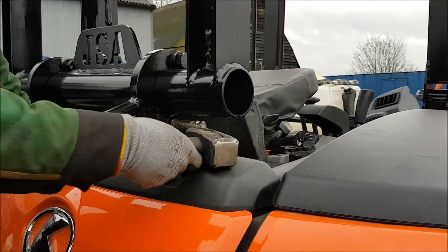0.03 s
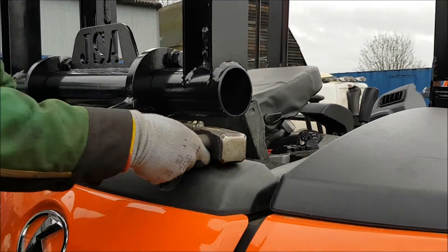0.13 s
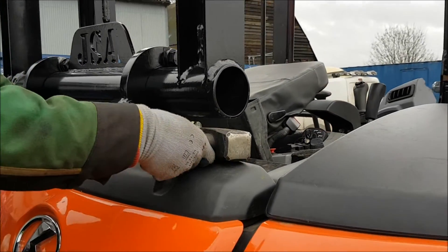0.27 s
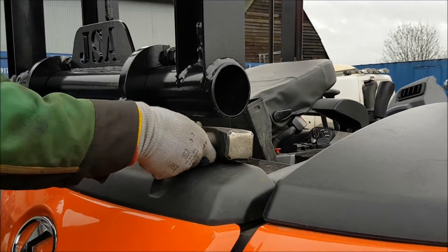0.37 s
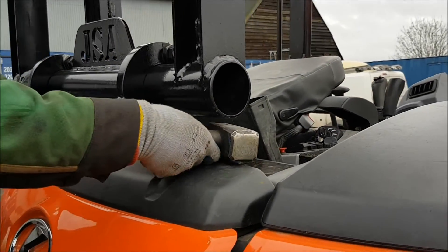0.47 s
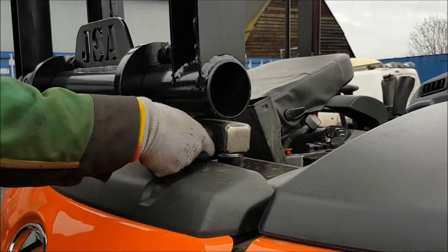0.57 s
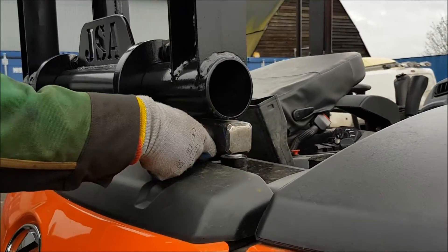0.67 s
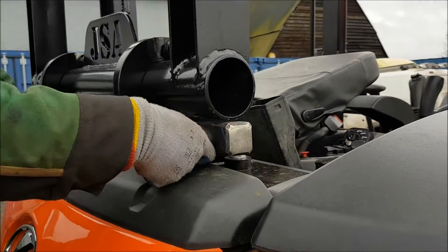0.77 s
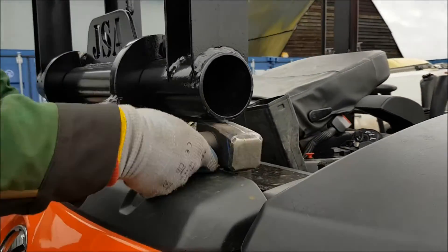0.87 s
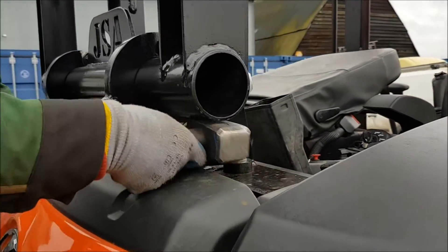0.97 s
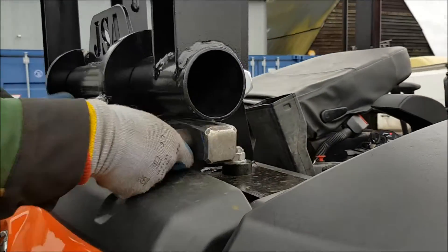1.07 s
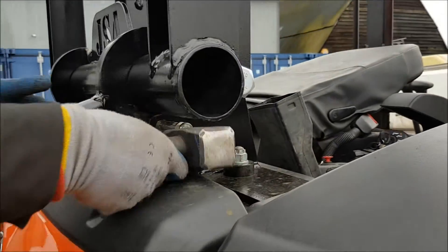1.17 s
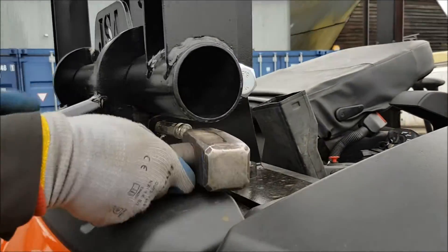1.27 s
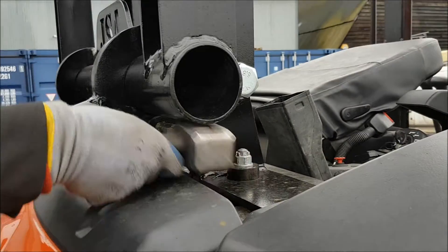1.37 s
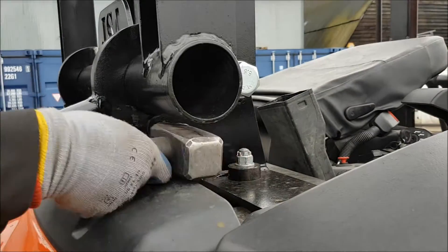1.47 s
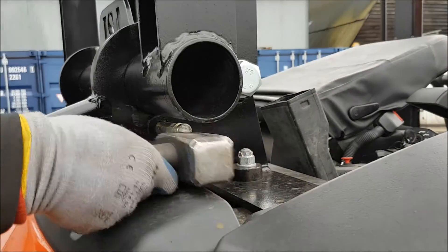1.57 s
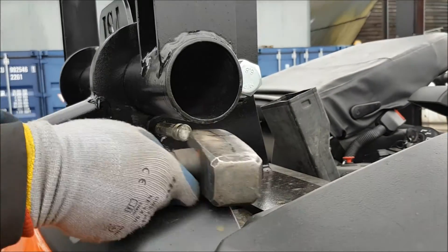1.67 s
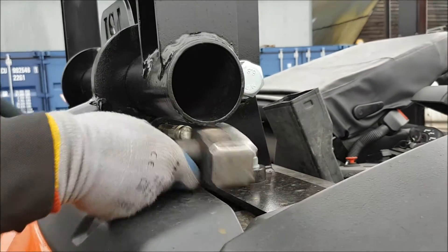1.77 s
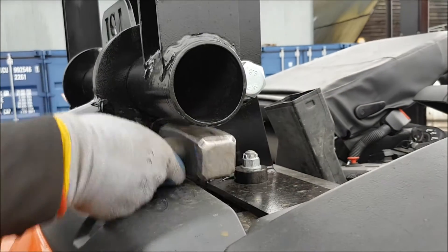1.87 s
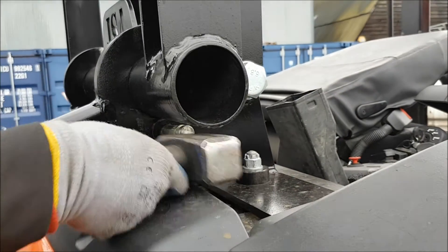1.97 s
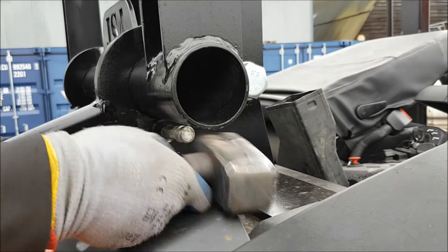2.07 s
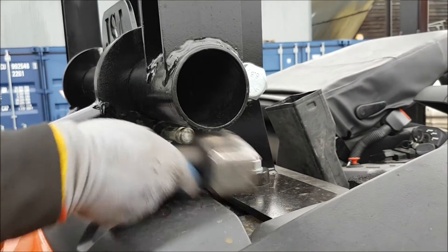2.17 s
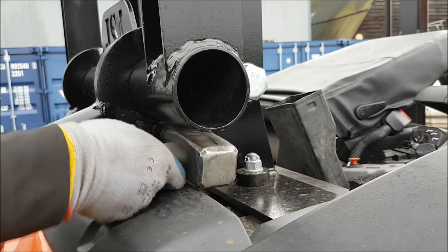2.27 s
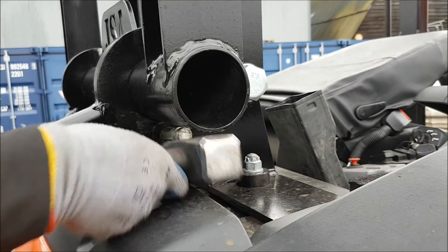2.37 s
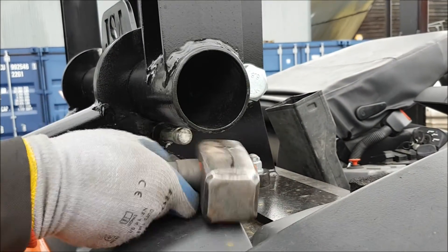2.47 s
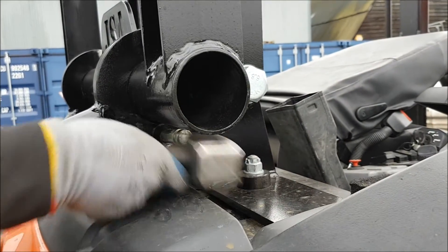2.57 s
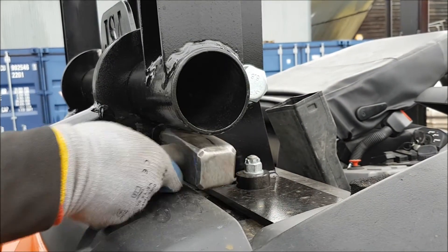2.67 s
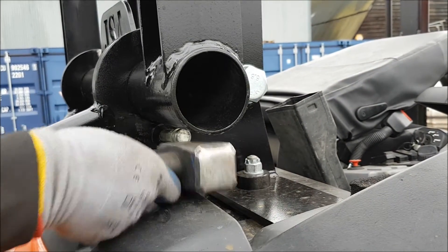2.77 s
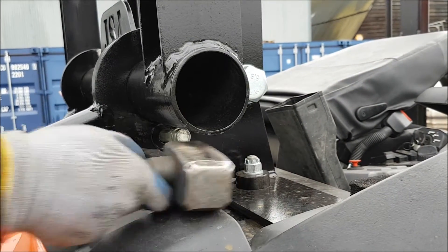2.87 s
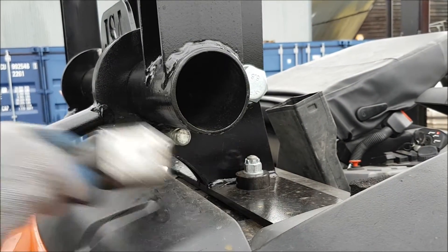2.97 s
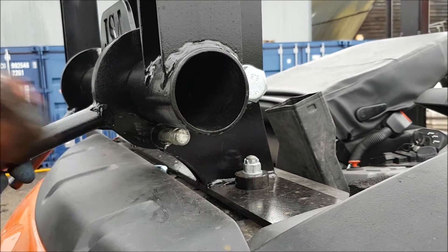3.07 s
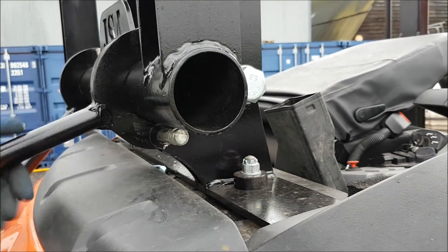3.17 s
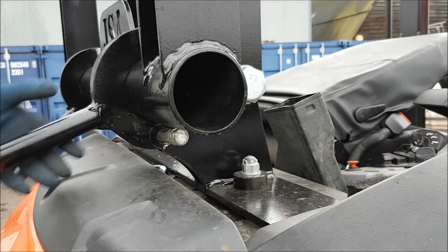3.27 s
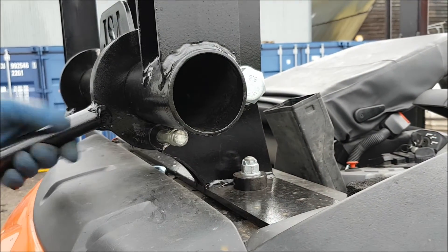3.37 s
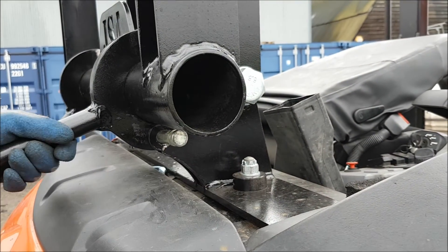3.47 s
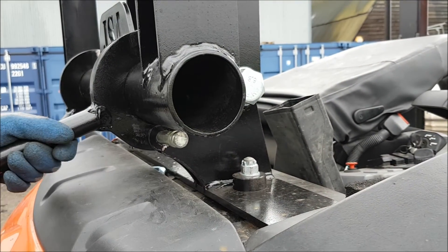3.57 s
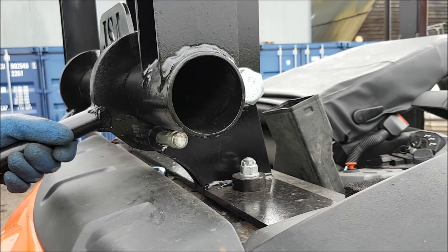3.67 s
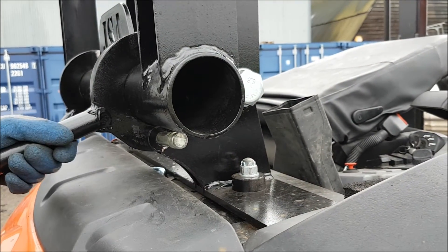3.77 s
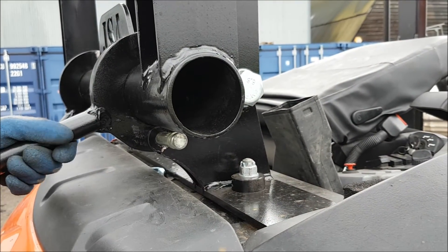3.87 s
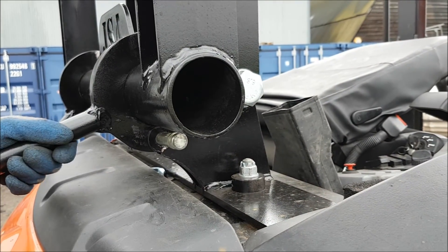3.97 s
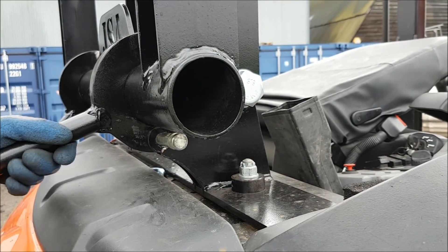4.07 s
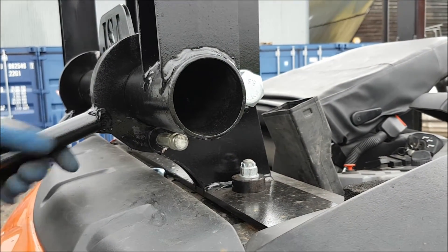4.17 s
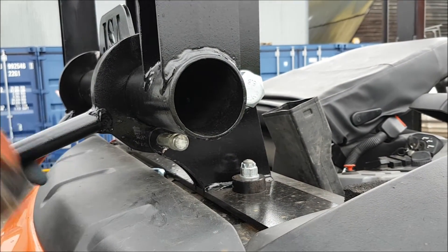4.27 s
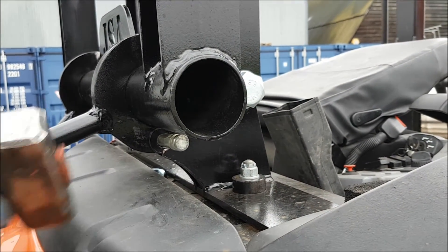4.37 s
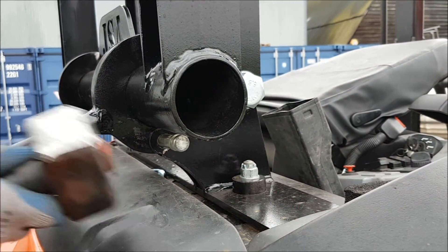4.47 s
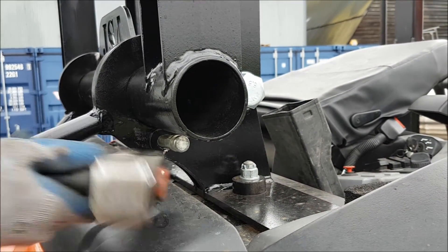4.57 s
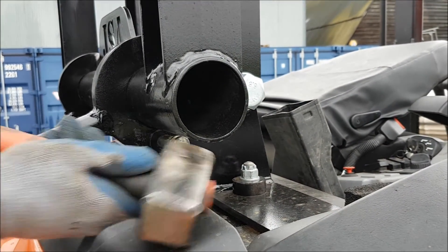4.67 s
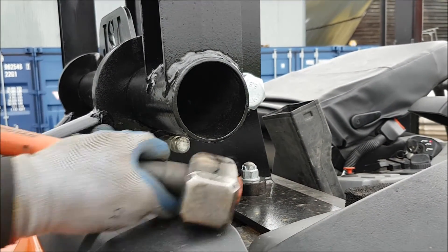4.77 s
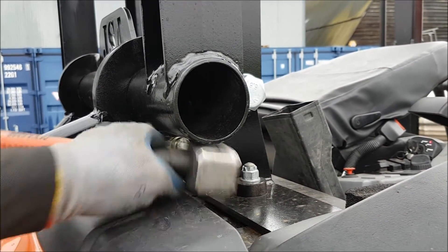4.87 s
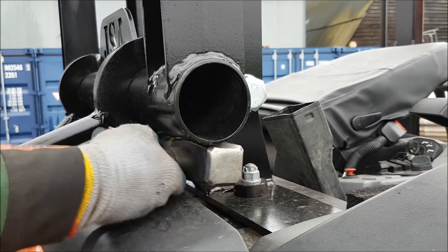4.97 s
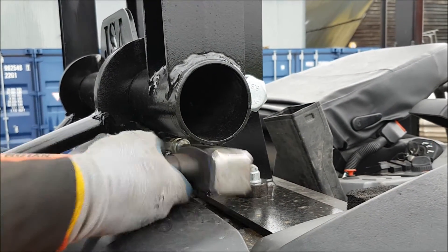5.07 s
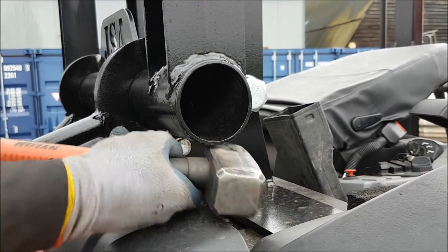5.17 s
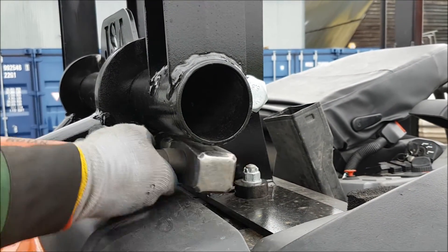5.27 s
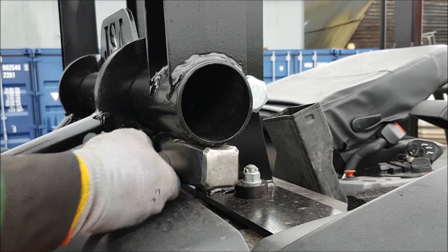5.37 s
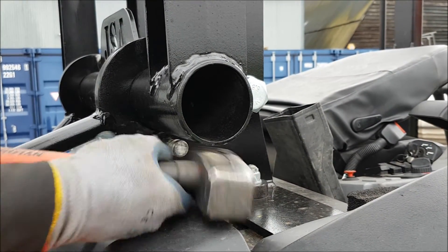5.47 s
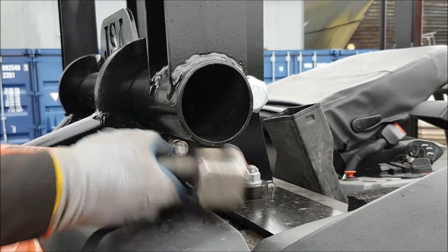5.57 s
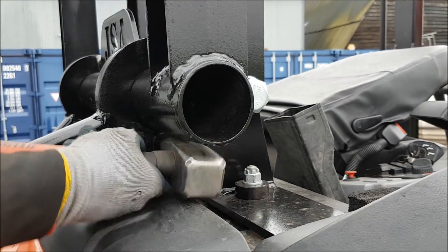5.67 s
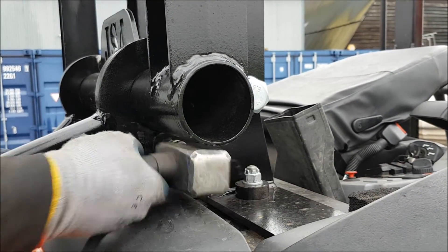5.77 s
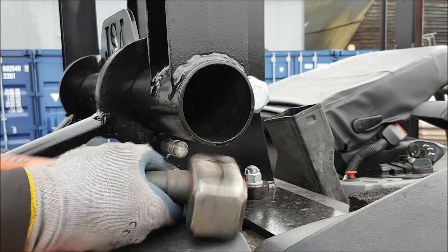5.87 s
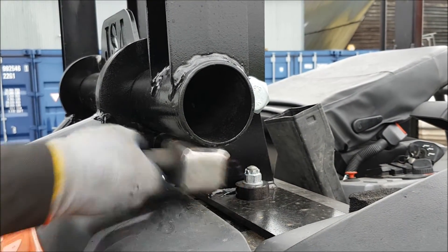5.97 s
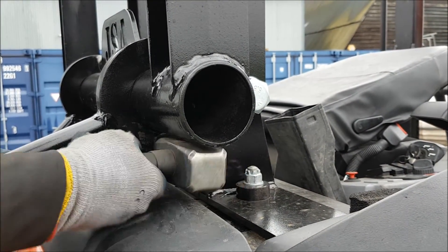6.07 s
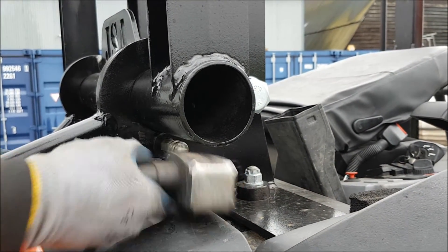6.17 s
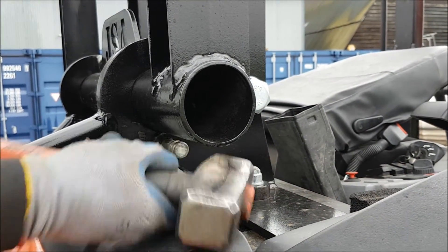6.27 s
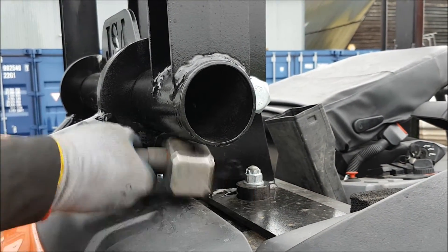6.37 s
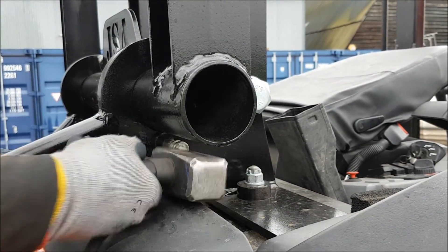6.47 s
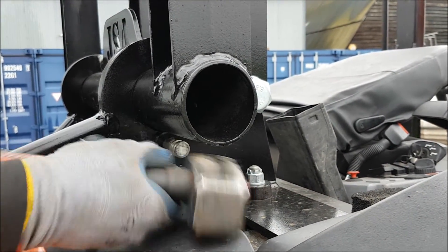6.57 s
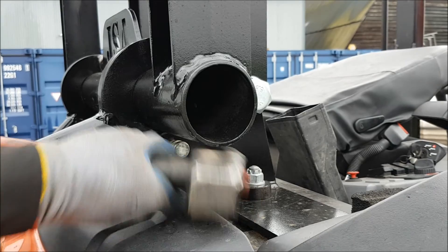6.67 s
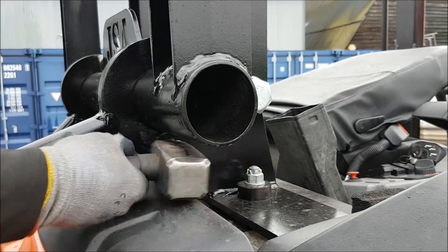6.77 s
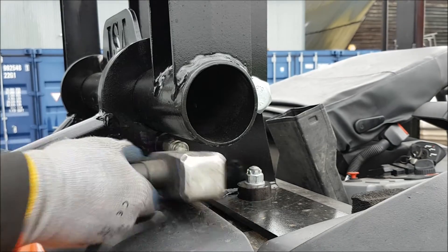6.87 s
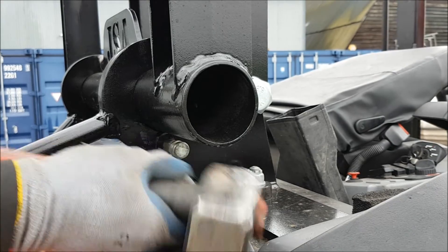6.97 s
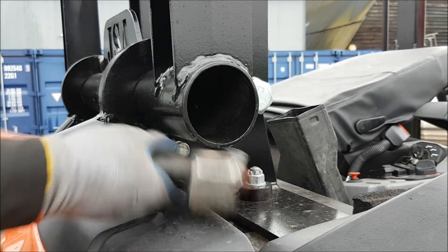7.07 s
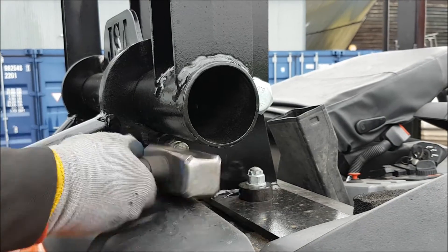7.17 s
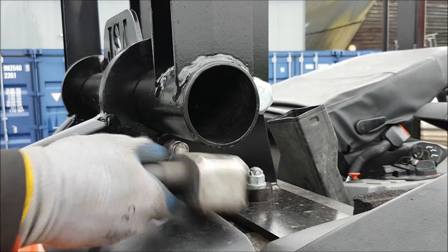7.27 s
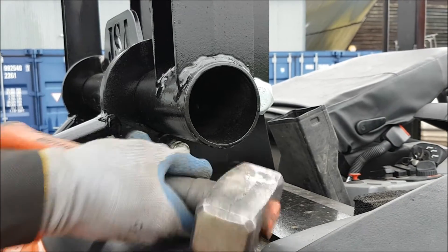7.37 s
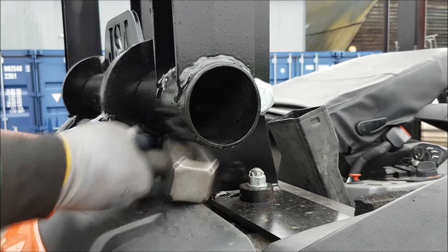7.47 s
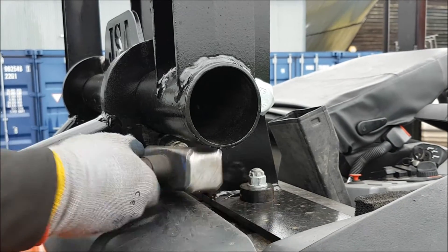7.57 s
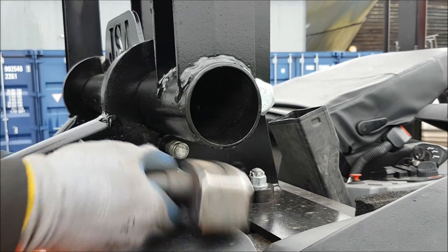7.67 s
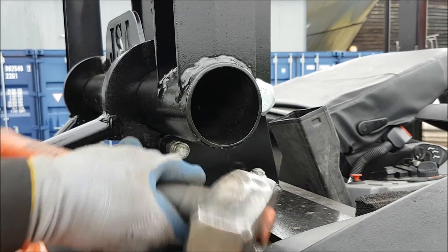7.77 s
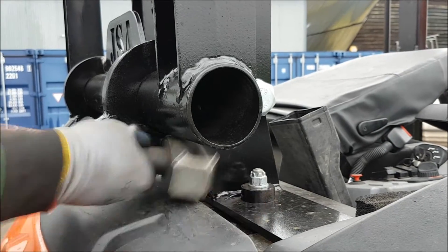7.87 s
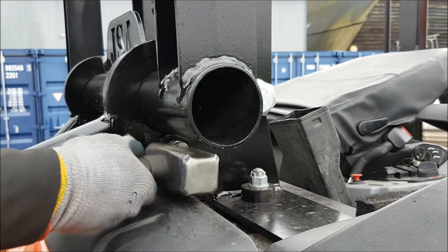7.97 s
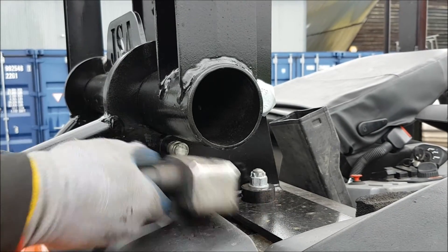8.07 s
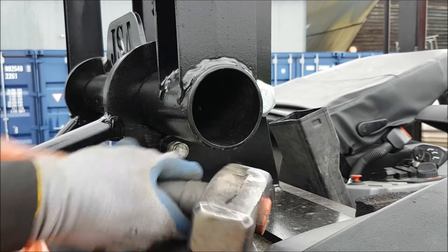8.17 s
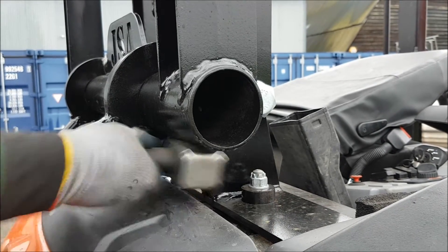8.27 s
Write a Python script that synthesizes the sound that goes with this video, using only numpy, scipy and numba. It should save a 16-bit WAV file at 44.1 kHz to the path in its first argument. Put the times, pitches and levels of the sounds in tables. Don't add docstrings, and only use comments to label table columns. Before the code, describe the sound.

A heavy hammer drives a steel pin into a machine frame with loud, clattering metallic blows, scuffs and bounces between them, light wind outdoors.

```python
import sys
import numpy as np
from scipy import signal
from scipy.fft import rfft, irfft, next_fast_len
from scipy.io import wavfile
from scipy.ndimage import uniform_filter1d
from numba import njit

SR = 44100
rng = np.random.default_rng(int(sys.argv[2]) if len(sys.argv) > 2 else 0)


def gain_from_decibels(decibels):
    exponent = np.asarray(decibels, float) / 20
    return 10 ** exponent


def waveform_to_disk(signal):
    frames = np.transpose(np.atleast_2d(signal))
    scaled = np.clip(frames, -1, 1) * 32767
    samples = np.round(scaled).astype(np.int16)
    wavfile.write(sys.argv[1], SR, samples)


N = 366471

# start in seconds, level in dB, bass heft in dB, treble edge in dB,
# contact in seconds.
BLOWS = [(0.6472, -6, 9.5, -11, 0.0058), (1.059, -4, 10, -9.5, 0.0054), (1.4534, -6.5, 8, -12, 0.012),
         (1.8733, -11.5, 4, -2, 0.015), (2.2659, -8, -2.5, -8, .012), (2.6513, -5.5, -5, -12.5, .015),
         (3.5821, -6, 3.5, -14, 0.03), (3.9278, -4.5, 0, -11, 0.014), (4.958, -4, 1.5, -10.5, 0.015),
         (5.3085, -6.5, 0, -8.5, 0.011), (5.6757, -4, -3.5, -16, 0.022), (6.0448, -4.5, -2.5, -16, 0.016),
         (6.4149, -6, 0, -13.5, 0.008), (6.7735, -6.5, -0.5, -12.5, 0.0095), (7.165, -7.5, 0, -8, 0.012),
         (7.554, -9.5, -4.5, -6.5, .019), (7.957, -10, 2, -5, .024)]
# start in seconds, level at 1 kHz in dB,
# dullness in dB per octave.
SCUFFS = [(0.9498, -16.5, 4), (1.4347, -21.5, 1.5), (1.8485, -29.5, 0.5), (4.945, -8.5, 1.5),
          (5.2697, -27, 0.5), (5.6416, -24.5, 1), (6.02, -14.5, 0), (6.3751, -21.5, -0.3),
          (6.7423, -15.5, -1.5), (7.1349, -16.5, .3), (7.525, -11.5, -1.5), (7.9421, -16, -1.5)]
# start in seconds, level at 1 kHz in dB, dullness in dB per octave.
BOUNCES = [(0.062, -34, -2), (0.1094, -28.5, -2.5), (.977, -28.5, 4), (2.33, -14, -0.5), (2.4218, -19, 5.5),
           (2.716, -15.5, -3.5), (2.798, -15.5, 3), (3.62, -1.5, 3), (3.9734, -4, 1), (4.714, -19.5, 7.5),
           (4.72, -25, 0.5), (4.7417, -35.5, 3.5), (5.806, -12, 3), (6.161, -13, 4.5), (6.291, -29.5, 5),
           (6.9074, -29, 5.5), (7.2893, -27, 6), (7.493, -39, 1), (7.6824, -15, 1.3), (7.878, -43, 2),
           (8.098, -32, 1.5), (8.2228, -26, 5)]
# start in seconds, level at 1 kHz in dB,
# dullness in dB per octave.
NUDGES = [(.003, -20.5, 9), (0.0183, -28.5, 8.5), (3.539, -34, 7), (4.3485, -44.5, 5), (4.4323, -40, 7.5),
          (4.505, -43, 6.5), (4.7908, -26, 7.5), (6.565, -45, 13), (6.664, -34.5, 6), (7.0441, -30.5, 6),
          (7.8104, -34.5, 6)]
# start in seconds,
# level at 1 kHz in dB, dullness in dB per octave.
THUMPS = [(.001, -15, 9.5), (.023, -16, 11), (.34, -31, 14.5), (.398, -36, 18.5), (.435, -38.5, 16.5),
          (.465, -38, 15.5), (.489, -35, 23.5), (.527, -28, 19.5), (.601, -31, 14.5), (.846, -27, 20.5),
          (1.029, -28.5, 16.5), (1.299, -28, 21.5), (1.433, -17, 4.5), (2.262, -9.5, 3.5), (2.329, -5.5, 5),
          (2.7176, -10, 2.5), (4.436, -33.5, 16.5)]
# bass, clank, mid and treble in dB, contact in seconds.
TOUCH_COLOUR = [
    (-0.5, -0.5, 0.5, -23, 0.029),
    (-4.5, -3, -2, -18.5, 0.0071),
    (8.5, 0, -6, -9, 0.0063),
    (-0.5, 2.5, -3.5, -6, 0.006),
]
RING_LENGTH = [
    0.97,
    1,
    0.71,
    0.39,
    0.045,
]
CONTACT_HZ = np.array([400, 1000, 2500, 9000])
CLANK_DB = 1.52

# frequency in Hz, level in dB.
CLATTER_COLOUR = [(30, -35), (60, -17), (150, -6), (300, -1), (750, -7.5), (1000, -3.5), (1500, -0.9),
                  (3000, -1.5), (5000, -3), (9000, -3), (12000, -9), (15400, -15.5), (16300, -26)]
# frequency in Hz, time to fall 60 dB in seconds.
CLATTER_T60 = [(70, 2), (200, 0.43), (500, 0.85), (1000, 0.32), (2000, 0.24), (4000, 0.17), (8000, 0.15),
               (14000, 0.12)]
# frequency in Hz, level in dB, t60 in seconds.
FRAME_MODES = [(156.3, -41, 0.47), (211, -53, 0.14), (257.5, -50.5, 0.34), (335, -45.5, 0.82),
               (387.8, -43.5, 0.32), (462, -44, 0.22), (517, -35.5, 0.25), (576, -44.5, .9),
               (643, -41, 0.62), (932.6, -31.5, 0.15), (977, -38, 0.3), (1053, -42, 0.62),
               (1130, -45, 0.22), (1420, -34.5, 0.38)]
# frequency in Hz, level in dB, t60 in seconds.
PANEL_MODES = [(1470, -34, .2), (1620, -40.5, 0.28), (1930, -35, 0.27), (1957, -35.5, 0.38),
               (2570, -41.5, .18), (2765, -29, 0.42), (3020, -35, 0.077), (3520, -32.5, 0.076),
               (3820, -30.5, 0.15), (4120, -30.5, 0.22)]
# frequency in Hz, level in dB, t60 in seconds.
HEAD_MODES = [(5420, -33, 0.22), (6700, -39.5, .07), (7940, -35.5, 0.094), (8800, -28, .06),
              (10100, -42, .08)]

# (start in seconds, level in dB).
TUBE_RINGS = [(92.7, 1.88, [(3.581, -27), (3.929, -29)]), (139, 0.8, [(2.651, -32.5)]),
              (293, 3.44, [(2.266, -41), (2.653, -36.5), (4.957, -29), (5.679, -34.5), (6.415, -33.5)]),
              (336.6, 1.6, [(.647, -22), (1.454, -28)]), (384, .64, [(1.06, -22.5)]),
              (533, 0.85, [(3.582, -23.5), (3.929, -27)]), (595, 0.89, [(3.582, -23), (3.929, -27.5),
              (7.165, -30.5)]), (643, 0.69, [(3.582, -20.5), (3.929, -24)]), (665, 0.78, [(3.582, -23),
              (3.929, -25.5)])]
# (start in seconds, level in dB).
PIN_RINGS = [(926, 0.084, [(2.268, -26), (2.328, -10.5), (5.31, -8.5)]), (942, .12, [(1.453, -16),
             (2.651, -19), (2.721, -17.5), (5.31, -16.5), (5.679, -23)]), (1036, 0.48, [(5.309, -19)]),
             (1416, 0.55, [(3.581, -22)]), (1860, 0.39, [(3.928, -23)]), (2010, 0.32, [(.951, -24.5),
             (4.97, -19.5)]), (2510, 0.35, [(7.555, -23), (7.957, -26)]), (2770, 0.2, [(2.421, -39),
             (6.042, -27)])]
# (start in seconds, level in dB).
HEAD_RINGS = [(4050, 0.61, [(7.165, -41.5), (7.555, -40)]), (5700, 0.36, [(1.455, -51), (6.044, -33),
              (6.415, -36), (6.775, -35.5)]), (6700, 0.12, [(1.06, -14.5)]), (7200, .38, [(1.873, -34.5),
              (2.268, -43), (4.958, -31.5)]), (7700, .1, [(1.875, -24), (7.957, -44)]),
              (9200, .076, [(4.958, -23.5)]), (10620, 0.42, [(5.309, -47), (5.677, -49), (6.044, -54),
              (6.415, -47), (6.775, -51), (7.165, -49)])]

# start, hardest and end in seconds, level in dB.
RUBS = [(.17, 0.225, 0.38, -57.5), (.36, 0.521, 0.87, -56), (.81, 0.83, .93, -49.5),
        (.92, 0.956, .96, -48.5), (.97, 1.053, 1.06, -48.5), (1.27, 1.3, 1.36, -57),
        (1.35, 1.404, 1.45, -54), (2.57, 2.604, 2.63, -64), (3.1, 3.194, 2.96, -58.5),
        (3.44, 3.575, 4.53, -64.5), (4.76, 4.932, 5.14, -44.5)]
# frequency in Hz, level in dB per Hz.
RUB_COLOUR = [(350, -23), (600, 9), (1450, -3.5), (1640, 1.5), (5260, -7.5), (7310, -12), (12700, -13.5),
              (16000, -31.5)]
RUB_EDGE_DB = -13.5

# time in seconds, level in dB.
WIND_LEVEL = [(0.0, -38), (0.32, -33.5), (1.04, -29.5), (1.36, -30.5), (1.53, -41.5), (1.8, -41.5),
              (3.12, -70), (3.45, -55), (3.8, -46), (4.0, -48.5), (4.4, -55), (4.65, -52.5), (4.93, -48.5),
              (5.23, -57.5), (6.62, -65), (6.92, -53), (8.31, -61)]
# frequency in Hz, level in dB per Hz.
WIND_COLOUR = [(12, -44), (20, -12), (126, 5), (390, -12), (620, -25.5), (1140, -30), (1260, -40.5),
               (1510, -31.5), (2500, -54.5), (3250, -81.5), (5500, -120)]
WIND_DB, WIND_LEAN_DB = 11, 1
# frequency in Hz, level in dB per Hz.
YARD_COLOUR = [(24, -45.5), (40, -19.5), (131, -2.5), (258, -9), (286, -1), (427, -12.5), (844, -10.5),
               (2430, -27.5), (14900, -47), (16500, -54.5)]
YARD_DB = -47.5

# frequency in Hz, likeness from 0 to 1.
PORT_LIKE = [(300, 0.89), (1500, 0.64), (12000, 0.45)]
# frequency in Hz, phase in radians.
PORT_TURN = [(100, 0.24), (500, 0.21), (1640, 1.475), (5000, 1.32), (16000, 0.96)]
BANDS_HZ = 30 * 2 ** np.arange(0, 9.4, 1 / 2)


def on_log(table, hz):
    f, v = np.transpose(table)
    return np.interp(np.log(hz), np.log(f), v)


def curve(table):
    return np.interp(np.arange(N) / SR, *np.transpose(table), -120, -120)


def walk(rate):
    k = int(SR / rate)
    held = np.repeat(rng.standard_normal(N // k + 1), k)
    return uniform_filter1d(held, k)[:N] * np.log(10) / 16


def bands(like, colour):
    size = next_fast_len(N)
    same, other = rfft(rng.standard_normal((2, size)))
    hz_axis = np.arange(len(same)) * SR / size + 1
    share = np.clip(like * on_log(PORT_LIKE, hz_axis), 0, 1)
    turn = np.exp(-1j * on_log(PORT_TURN, hz_axis))
    right = (share * same + np.sqrt(1 - share ** 2) * other) * turn
    pair = np.array([same, right]) * gain_from_decibels(on_log(colour, hz_axis))
    for hz in BANDS_HZ:
        a, b = np.searchsorted(hz_axis, [hz / np.sqrt(2), hz * np.sqrt(2)])
        if colour[0][0] < hz < 1.2 * colour[-1][0]:
            part = np.zeros_like(pair)
            part[:, a:b] = pair[:, a:b] * np.cos(np.pi * np.log2(hz_axis[a:b] / hz))
            yield hz, irfft(part, size)[:, :N]


def coloured(colour, like, flicker_db, rate, shared):
    flickering = sum(np.exp(flicker_db * walk(rate)) * band for hz, band in bands(like, colour))
    out = np.exp(shared) * flickering
    return out / np.sqrt(np.mean(out ** 2))


def wind():
    puffs = 3.6 * np.array([walk(28), walk(28)]) + 3 * walk(14)
    lean_db = WIND_LEAN_DB * np.array([[.5], [-.5]])
    gust = gain_from_decibels(curve(WIND_LEVEL) + WIND_DB + lean_db)
    return coloured(WIND_COLOUR, 0, 1.1, 12, puffs) * gust


def yard():
    return coloured(YARD_COLOUR, 0.54, 1.2, 7.2, 1.8 * walk(0.99)) * gain_from_decibels(YARD_DB - 2.5)


def knocks():
    rows = []
    for s, db, heft, edge, hold in BLOWS:
        rows.append((s, db + heft, db + CLANK_DB, db - CLANK_DB, db + edge, hold, RING_LENGTH[0]))
    octaves = np.log2(CONTACT_HZ / 1000)
    kinds = zip((SCUFFS, BOUNCES, NUDGES, THUMPS), TOUCH_COLOUR, RING_LENGTH[1:])
    for table, (*colour, hold), longer in kinds:
        for s, db, dull in table:
            rows.append((s, *(db + np.array(colour) - dull * octaves), hold, longer))
    return np.array(rows)


def struck_db(hz, rows):
    return np.array([on_log(list(zip(CONTACT_HZ, row[1:5])), hz) for row in rows])


@njit
def swell(start, hold, peak, fade, rise, crack, settle):
    power = np.zeros(N)
    for k in range(len(start)):
        level, closed, spike = peak[k], 1., crack
        for i in range(start[k], N):
            closed, spike = closed * rise, spike * settle
            if i - start[k] > hold[k]:
                level *= fade[k]
            power[i] += (level * (1 - closed) * (1 + spike)) ** 2
            if level < 1e-4 * peak[k]:
                break
    return np.sqrt(power)


def envelope(rows, db, t60, rise, crack=0., chatter=1):
    start = (rows[:, 0] * SR).astype(np.int64)
    hold = chatter * rows[:, 5] * SR
    fade = gain_from_decibels(-60 / (t60 * rows[:, 6] * SR))
    rise_step, settle_step = np.exp(-1 / (rise * SR)), np.exp(-1 / (0.0011 * SR))
    return swell(start, hold, gain_from_decibels(db), fade, rise_step, float(crack), settle_step)


def clatter():
    rows, out = knocks(), 0
    rattle = np.exp(1.8 * walk(200))
    for hz, noise in bands(1.0, CLATTER_COLOUR):
        db = struck_db(hz, rows) + 2.5 * rng.standard_normal(len(rows))
        t60 = on_log(CLATTER_T60, hz)
        rise = .0002 + .045 * (60 / hz) ** 1.3
        crack = 1.1 * np.clip(hz / 4000, .5, 2.5)
        body = envelope(rows, db, t60, rise, crack)
        yard_echo = envelope(rows, db - 26, min(3.8 * t60, 1.5), rise=.02)
        out = out + noise * (body * rattle + yard_echo)
    return gain_from_decibels(-0.44) * out


def ring(x, hz, t60):
    r = np.exp(-np.log(1000) / (t60 * SR))
    w = 2 * np.pi * hz / SR
    return signal.lfilter([np.sin(w)], [1, -2 * r * np.cos(w), r * r], x)


def frame_modes():
    rows, out = knocks(), 0
    grit = rng.standard_normal((2, 2 * N))
    skips = rng.integers(99, N, 64)
    for (hz, db, t60), skip in zip(FRAME_MODES + PANEL_MODES + HEAD_MODES, skips):
        late = int(round(on_log(PORT_TURN, hz) * SR / (2 * np.pi * hz)))
        like = np.clip(on_log(PORT_LIKE, hz), 0, 1)
        blow_db = struck_db(hz, rows)
        blow_db = blow_db + .3 * np.minimum(blow_db + 20, 0)
        push = envelope(rows, blow_db + db, 0.023, rise=0.00028, chatter=0.086)
        same, other = push * grit[:, skip:skip + N]
        right = np.roll(like * same + np.sqrt(1 - like ** 2) * other, late)
        t60 = min(t60, 260 / hz)
        out = out + ring(np.array([same, right]), hz, t60)
    return gain_from_decibels(-0.24) * out


def rubbing():
    level = 0
    for start, hardest, end, db in RUBS:
        edge = db + RUB_EDGE_DB
        level = level + gain_from_decibels(curve([(start, edge), (hardest, db), (end, edge)]))
    return coloured(RUB_COLOUR, 0.78, 1.6, 34, 1.8 * walk(90)) * level * gain_from_decibels(7.5)


def pin_rings():
    out = np.zeros((2, N))
    parts = TUBE_RINGS + PIN_RINGS + HEAD_RINGS
    rung = [(s, hz, db, t60) for hz, t60, blows in parts for s, db in blows]
    for (s, hz, db, t60), phase in zip(rung, rng.uniform(0, 2 * np.pi, len(rung))):
        i = int(s * SR)
        t = np.arange(min(N - i, 2 * SR)) / SR
        port_lag = np.array([[0], [on_log(PORT_TURN, hz)]])
        tone = np.sin(2 * np.pi * hz * t + phase - port_lag)
        swelling = 1 - np.exp(-t * hz / 5)
        out[:, i:i + len(t)] += gain_from_decibels(db - 60 * t / t60) * swelling * tone
    return out


def scene():
    hammer = clatter() + frame_modes() + rubbing() + pin_rings()
    return wind() + yard() + hammer * gain_from_decibels(np.array([[.4], [-.4]]))


def roll_off(x):
    return signal.sosfilt(signal.butter(12, 16850, fs=SR, output="sos"), x)


def record(dry):
    rounded = np.tanh(0.81 * dry) / 0.84
    top_cut = signal.ellip(8, .2, 60, 16500, fs=SR, output="sos")
    return roll_off(signal.sosfilt(top_cut, rounded))


dry = scene()
out = record(dry)
waveform_to_disk(out)
```